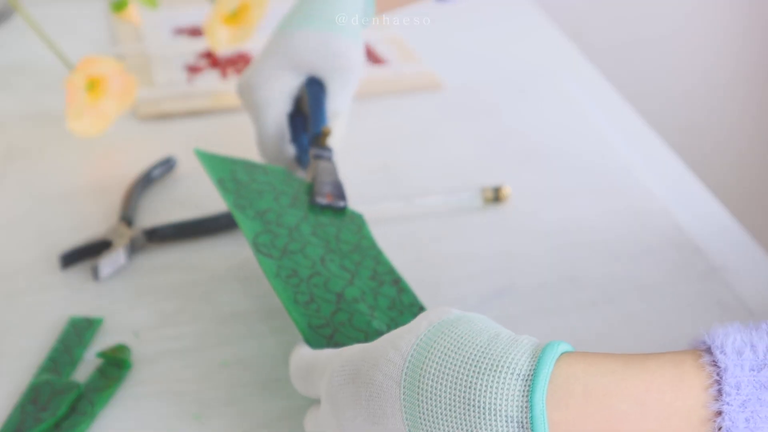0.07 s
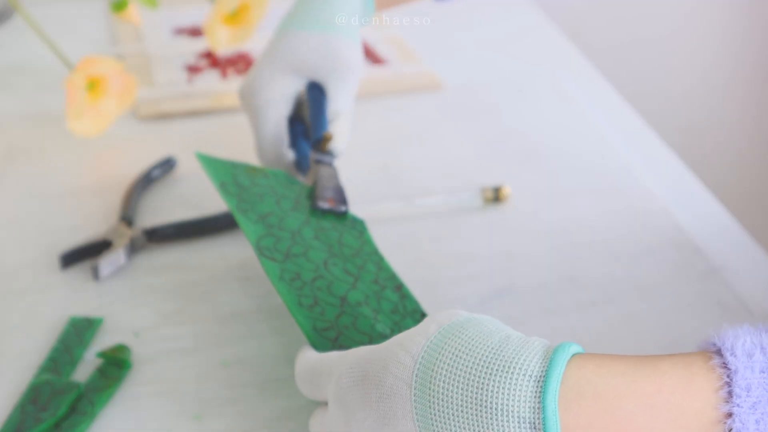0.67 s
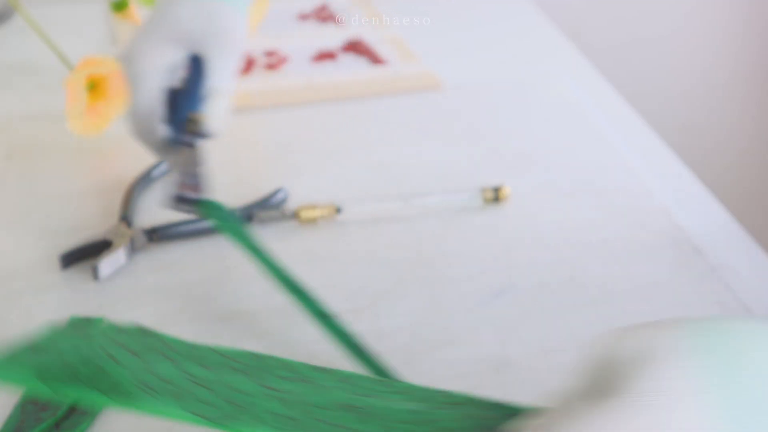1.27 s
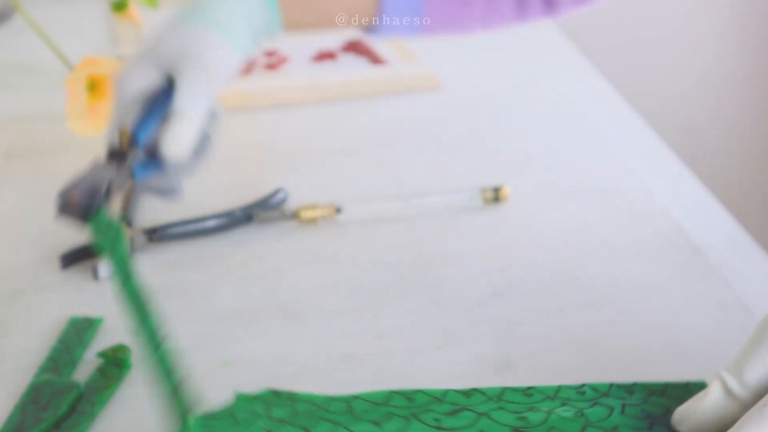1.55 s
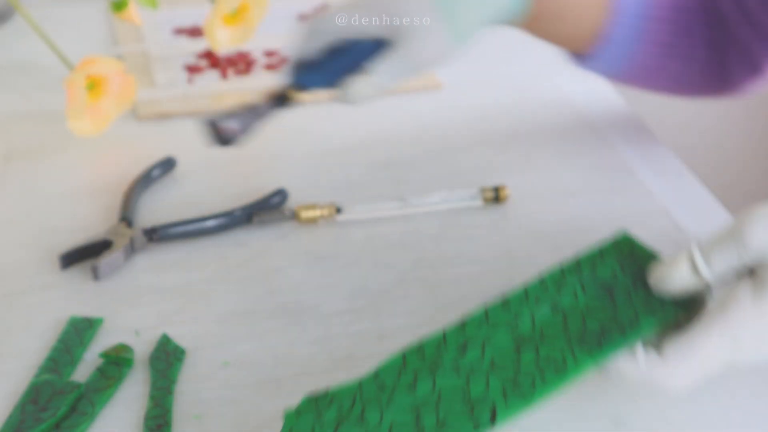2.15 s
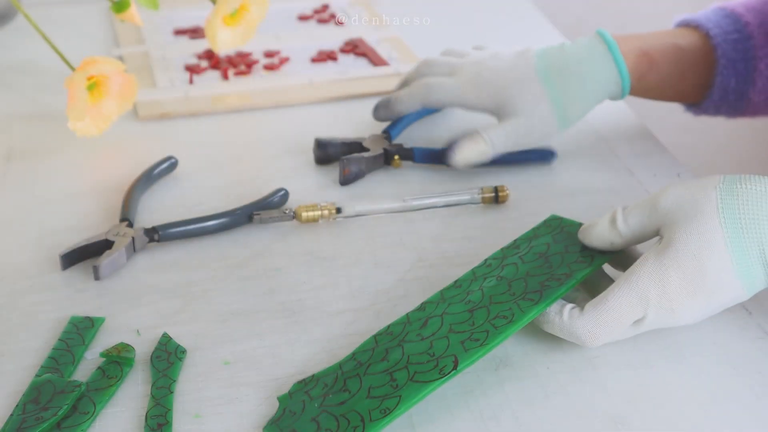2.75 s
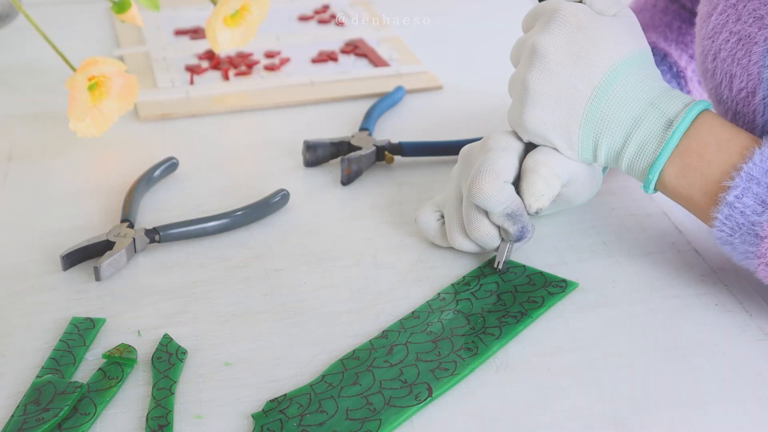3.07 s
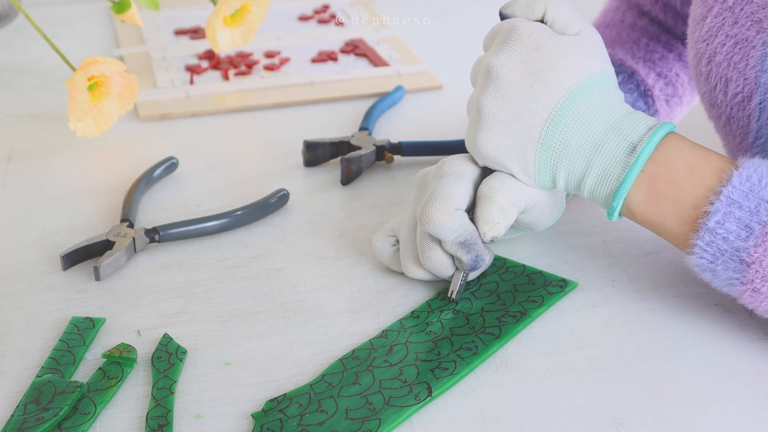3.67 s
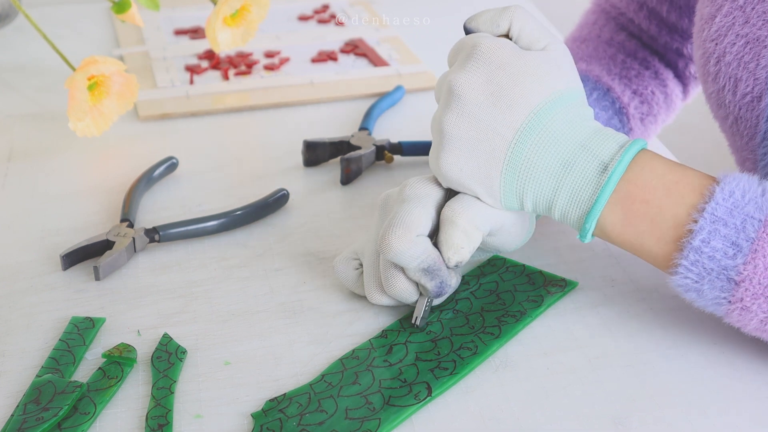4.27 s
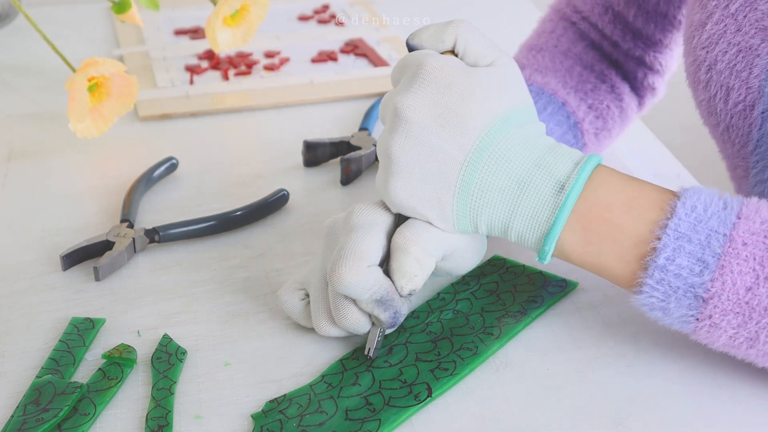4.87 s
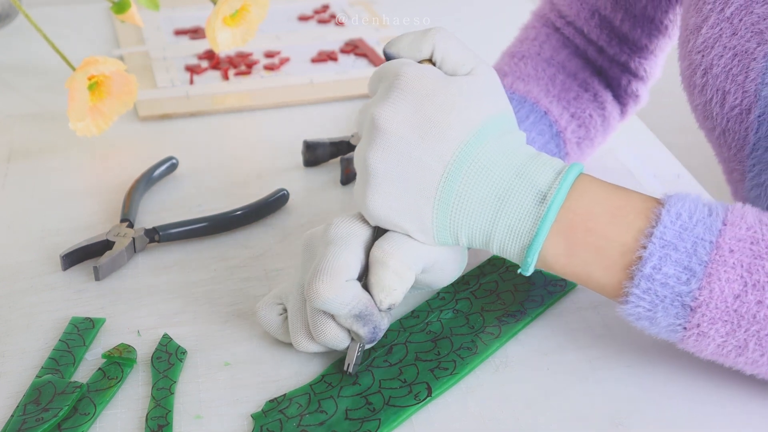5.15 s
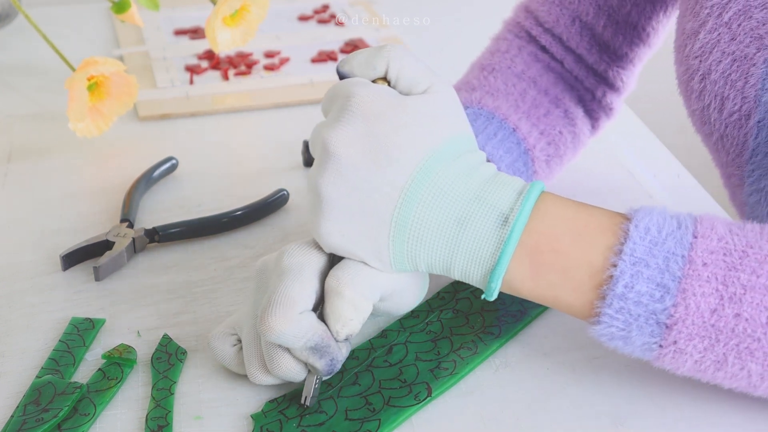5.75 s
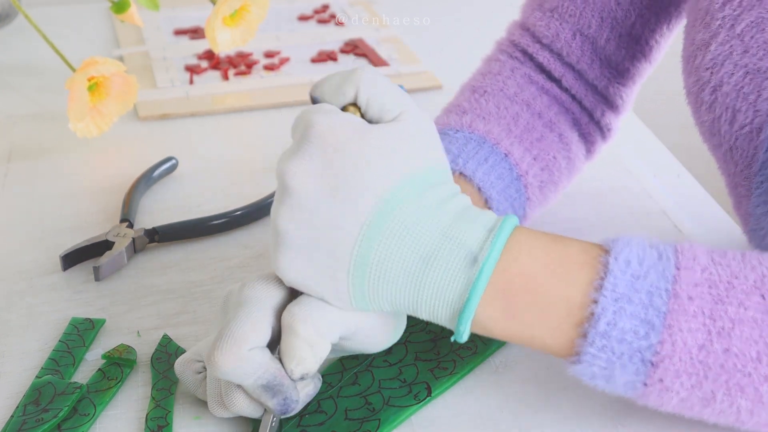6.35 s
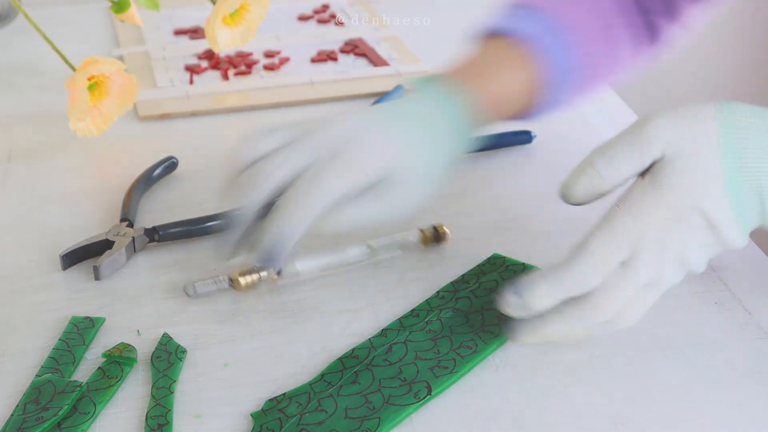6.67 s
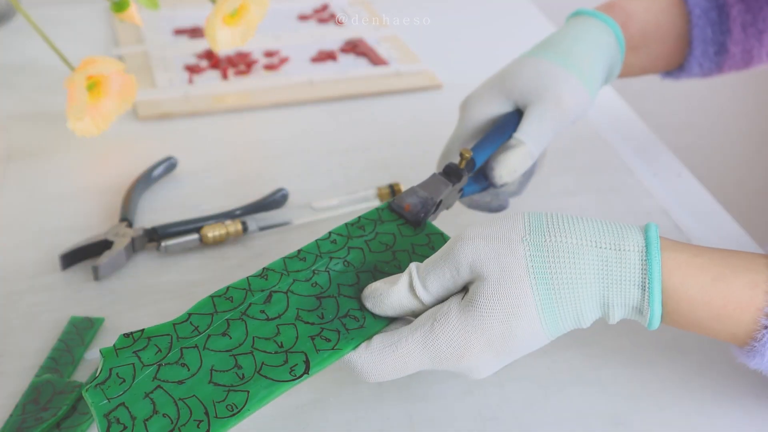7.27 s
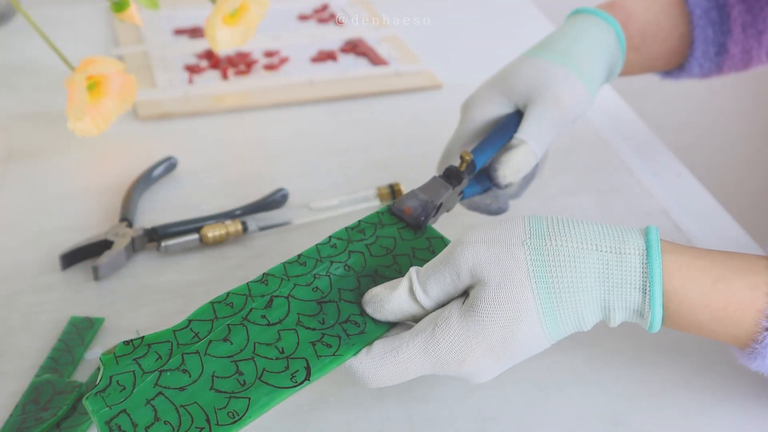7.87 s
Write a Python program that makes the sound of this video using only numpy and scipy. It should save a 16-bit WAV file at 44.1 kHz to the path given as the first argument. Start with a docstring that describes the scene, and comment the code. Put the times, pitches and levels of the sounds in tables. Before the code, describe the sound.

In a quiet, slightly reverberant workshop, glass cracks sharply in the jaws of pliers. The sheet and strip are set down with ringing clinks, followed by a knock and the clunk of the pliers on the bench. The sound moves close up as a glass cutter scores a line, a steady scratchy crackle ending in a few hard clacks. Small plier ticks then lead to a second brittle snap.

```python
"""Stained glass is cut on a workbench. In a live room, pliers tick on a sheet and snap off a strip:
brittle fracture sets the glass ringing. Sheet, strip and pliers are put down, and the bench top booms.
Then, close and dry, a cutter wheel crackles along a new score line, crushing tiny chips in stick-slip
motion, and clacks off the edge. Back in the room the pliers bite, tick and snap the sheet again."""
import sys
import numpy as np
from scipy import signal
from scipy.fft import rfft, irfft, next_fast_len
from scipy.io import wavfile
from scipy.ndimage import uniform_filter1d, map_coordinates

SR = 44100
rng = np.random.default_rng(int(sys.argv[2]) if len(sys.argv) > 2 else 0)


def output_pcm(signal):
    """Save a mono or channel-first signal as 16-bit PCM at the path in sys.argv[1].

    Samples are clipped to [-1, 1] before scaling.
    """
    pcm = np.clip(np.atleast_2d(signal).T, -1, 1) * 32767
    wavfile.write(sys.argv[1], SR, np.round(pcm).astype(np.int16))


N = 353682
CLOSE_START_S, CLOSE_END_S = 2.937, 6.818  # the scene changes to the cutter, heard close and dry

# Reverberation time in the live room and close up: f/Hz, t60/s
ROOM_DECAY = [(100, 0.36), (300, 0.5), (1400, 0.4), (3000, 0.31), (7000, 0.24), (15000, .3)]
CLOSE_DECAY = [(100, 0.18), (1000, .14), (5000, 0.16), (15000, 0.071)]
# Stereo width in the live room and close up: f/Hz, side minus mid/dB
ROOM_WIDTH = [(80, -30.5), (350, -22), (1300, -9), (2400, -5.5), (4500, 5), (8000, 1.5), (15000, 5)]
CLOSE_WIDTH = [(100, -27), (700, -29.5), (1300, -21), (2400, -9.5), (8000, -4), (15000, 9)]
# Free modes of the wide sheet: f/Hz, level/dB, t60/s
WIDE_RING = [(1203, -2.5, 0.35), (1335, -1, 0.3), (1430, -1, .3), (2140, 0, 0.28), (2320, -2, 0.48),
             (2640, -1.5, .26), (3650, -12.5, .25), (6600, -18, 0.254), (9750, -19, 0.28)]
# The wheel stalls at a ridge, then jumps free: t/s of the jump, duration/s, depth/dB
STALLS = [(3.030, 0.042, 2), (3.103, 0.037, 13), (3.159, 0.027, 11), (3.429, 0.016, 6.5),
          (3.593, 0.044, 13), (3.693, 0.042, 14), (3.738, 0.037, 13), (3.796, 0.025, 10.5),
          (4.031, 0.039, 5.5), (4.099, 0.012, 8), (4.282, 0.014, 12), (4.337, 0.029, 7), (4.386, .028, 5),
          (4.425, .016, 10), (4.622, 0.049, 12), (4.746, .018, 3.5), (4.912, 0.06, 11.5), (4.982, 0.022, 7),
          (5.185, 0.016, 8), (5.556, 0.033, 5), (5.634, 0.071, 7), (5.756, 0.047, 3.5), (5.915, 0.036, 7.5),
          (6.148, 0.013, 9), (6.213, 0.027, 9), (6.291, 0.035, 17.5), (6.56, 0.058, 16)]


def amp(db):
    """Amplitude ratio of a level in decibels."""
    return 10 ** (np.asarray(db) / 20)


def leftward(db):
    """Intensity panning: the left channel gains db and the right loses as much."""
    return amp([[db], [-db]])


def unit_rms(x):
    """Normalisation to unit mean power."""
    return x / np.sqrt(np.mean(x ** 2) + 1e-20)


def unit_energy(x):
    """Normalisation of each channel to unit energy."""
    return x / np.linalg.norm(x, axis=1, keepdims=True)


def along(points, hz):
    """Interpolation of (f/Hz, value) points on a logarithmic frequency axis."""
    f, values = np.transpose(points)
    return np.interp(np.log(hz + 1), np.log(f), values)


def resonance(hz, centre_hz, half_width_hz):
    """Lorentzian resonance curve of height 1."""
    return 1 / (1 + ((hz - centre_hz) / half_width_hz) ** 2)


def body_db(spectrum, modes, hz):
    """Frequency response: a spectrum (f/Hz, level/dB) plus modes (f/Hz, half-width/Hz, boost/dB)."""
    return along(spectrum, hz) + sum(db * resonance(hz, f, width) for f, width, db in modes)


def shaped(x, response_db):
    """Minimum-phase filtering: by causality, resonances ring after a blow and never before."""
    size = 2 * next_fast_len(x.shape[-1] // 2 + SR // 8)
    gain = amp(response_db(np.fft.rfftfreq(size, 1 / SR)))
    cepstrum = irfft(np.log(gain + 1e-6))
    cepstrum[1:size // 2] *= 2
    cepstrum[size // 2 + 1:] = 0
    return irfft(rfft(x, size) * np.exp(rfft(cepstrum)), size)[..., :x.shape[-1]]


def stereo(pair, width):
    """Sum and difference turn uncorrelated mid and side signals into left and right."""
    side = shaped(pair[1], lambda hz: along(width, hz))
    return np.array([pair[0] + side, pair[0] - side])


def decay(t, t60):
    """Exponential damping: 60 dB lost in t60 seconds."""
    return np.exp(-np.log(1000) * t / t60)


def bell(t, centre, spread):
    """Gaussian envelope of height 1."""
    return np.exp(-((t - centre) / spread) ** 2)


def diffuse_tail(decay_times):
    """Diffuse field: two noise responses in which each frequency is damped at its own rate."""
    hz, t, bands = signal.stft(rng.standard_normal((2, SR * 3 // 4)), SR, nperseg=256)
    bands = bands * decay(t, along(decay_times, hz)[:, None])
    return unit_energy(signal.istft(bands, SR, nperseg=256)[1])


def blows(rows, spectrum, modes, click, early_db, decay_times=ROOM_DECAY, width=ROOM_WIDTH):
    """Impact excitation: a click and a dense rattle, then early reflections and reverberation.
    Blow rows: t/s, level/dB, bass/dB, treble/dB, rattle t60/s, reverberation/dB."""
    out = np.zeros((2, N + SR))
    for start, db, bass_db, treble_db, t60, room_db in rows:
        tail = diffuse_tail(decay_times)
        t = np.arange(tail.shape[1]) / SR
        rattle = unit_energy(rng.standard_normal(tail.shape) * decay(t, t60))
        rattle[0, 0] = click  # from straight ahead
        early = unit_energy(rng.standard_normal(tail.shape) * bell(t, 0.0083, 0.0027))
        late = tail * (1 - np.exp(-t / 0.0027))
        burst = unit_energy(rattle) + amp(early_db) * early + amp(room_db) * late
        # Heavy contacts add bass, hard ones add treble.
        contact_db = lambda hz: bass_db / (1 + (hz / 700) ** 2) + treble_db * hz**2 / (hz**2 + 4000**2)
        hit = stereo(shaped(burst, lambda hz: body_db(spectrum, modes, hz) + contact_db(hz)), width)
        attack_rms = np.sqrt(np.mean(hit[:, :SR // 100] ** 2))
        out[:, round(start * SR):][:, :len(t)] += amp(db) * hit / attack_rms
    return out[:, :N]


def ringing(start, modes, gain_db, phase_spread=0.41, diffuse_db=0, flutter_per_s=70):
    """Free vibration of damped modes; interference with room echoes makes each one flutter."""
    t = np.arange(SR) / SR
    ring = np.zeros((2, SR))
    for hz, db, t60 in modes:
        knots = rng.standard_normal((2, SR // 100))
        echoes = np.interp(t * flutter_per_s, np.arange(knots.shape[1]), knots[0] + 1j * knots[1])
        flutter = (1 + amp(diffuse_db) * echoes) / np.sqrt(1 + amp(diffuse_db) ** 2)
        phase = 2 * np.pi * hz * t + rng.normal(0, phase_spread, (2, 1))
        ring += amp(db) * decay(t, t60) * np.imag(flutter * np.exp(1j * phase))
    return amp(gain_db) * np.pad(ring, ((0, 0), (round(start * SR), N)))[:, :N]


def coloured_noise(spectrum, width):
    """Spectral shaping of white noise into a steady stereo hiss of unit power."""
    noise = shaped(rng.standard_normal((2, N)), lambda hz: along(spectrum, hz))
    return unit_rms(stereo(noise, width))


def room_tone(air_db=-52.68, hum_db=-63, hum_hz=204):
    """Broadband air noise, joined by a faint narrow-band hum after the close passage."""
    # Spectrum of the air: f/Hz, level/dB; its width: f/Hz, side minus mid/dB
    air_spectrum = [(19, -33), (32, -7.5), (60, -7), (140, -14), (219, -5.5), (340, -14.5), (504, -15),
                    (826, -19.5), (7330, -39.5), (16000, -66)]
    air_width = [(40, -15.5), (200, -7), (700, 0), (4000, 3.5)]
    air = coloured_noise(air_spectrum, air_width)
    hum = unit_rms(shaped(rng.standard_normal(N), lambda hz: 20 * np.log10(resonance(hz, hum_hz, 7))))
    return amp(air_db) * air + amp(hum_db) * hum * (np.arange(N) > CLOSE_END_S * SR)


def close_hiss(level_db=-56):
    """Stationary noise behind the cutter, strongest in the bass."""
    # Spectrum of the hiss: f/Hz, level/dB
    hiss_spectrum = [(25, -14.5), (70, -7.5), (150, 6), (400, -2.5), (1500, -6.5), (6000, -14.5),
                     (12000, -20.5), (16000, -22.5)]
    return amp(level_db) * coloured_noise(hiss_spectrum, CLOSE_WIDTH)


def bench_booming(boom_db=-12):
    """Heavy contacts excite the low plate modes of the bench top."""
    # Contacts (blow rows) and the bench's response (columns as in body_db)
    thuds = [(2.490, -19, -0.5, -2, 0.15, -3.5), (2.790, -24.5, 6, -3, 0.22, -0.5)]
    bench_spectrum = [(15, -57), (25, -26), (54, -18), (124, -6), (198, -7.5), (253, -2), (286, -16),
                      (332, -4), (630, -10.5), (826, -25), (1190, -18.5), (1690, -28.5), (2160, -26.5),
                      (9000, -80), (11700, -108)]
    bench_modes = [(76.6, 6.9, 3.6), (139, 19, 2.7), (264, 8.7, 2.3), (340, 7.7, 3.5), (1237, 40, 3.7),
                   (1650, 100, 10.5)]
    # Free modes of the top: f/Hz, level/dB, t60/s
    bench_ring = [(137, -9, 0.33), (258, 4, 0.59), (326.8, 9, 0.27), (403, -4, 0.55), (467, 2, 0.31)]
    out = blows(thuds, bench_spectrum, bench_modes, click=0.14, early_db=-41)
    for start, db, *_ in thuds:
        out += ringing(start, bench_ring, db + boom_db,
                       phase_spread=0.1, diffuse_db=-22, flutter_per_s=24.5)
    return out


def pliers_laid_down():
    """Impact of steel on wood: the nose touches, the whole weight follows and the tool rings."""
    # Contacts of the nose and of the whole tool (blow rows)
    nose_touch = [(2.769, -41, 3, 2, .06, -5)]
    tool_drop = [(2.7899, -14, 0, 1, 0.011, -3), (2.7955, -14, 0, -3, 0.074, -2.5)]
    # Their responses (columns as in body_db)
    steel_on_wood = [(50, -5), (300, -20), (780, -17.5), (980, -1), (1500, 0.5), (2300, -4), (3000, -14.5),
                     (3700, -22.5), (5000, -31.5), (7500, -37), (15000, -62)]
    nose_modes = [(1400, 150, 10), (5400, 350, 33), (7800, 600, 22)]
    tool_modes = [(1555, 82, 6.3)]
    # Free modes of the steel: f/Hz, level/dB, t60/s
    steel_ring = [(1136, -2, 0.52), (1330, 4.5, 0.73), (1410, -7, .45), (1550, -14, .48)]
    touch = blows(nose_touch, steel_on_wood, nose_modes, click=0.3, early_db=-12)
    drop = blows(tool_drop, steel_on_wood, tool_modes, click=0.99, early_db=-6)
    return touch + drop + ringing(tool_drop[0][0], steel_ring, gain_db=-29.5)


def glass_laid_down(sheet_down_s=1.7965, strip_drop_s=1.9961, far_end_lag_s=0.0054, soft_limit_hz=1800):
    """The strip brushes along the sheet, then glass lands end by end; a soft contact excites only the low
    modes."""
    # Landings and bounces: t/s, level/dB, bass/dB, treble/dB, resonance f/Hz, second contact/dB
    knocks = [(1.014, -27.5, 1.5, -4, 3260, -2), (1.7965, -14.5, -2, -0.5, 1370, -1),
              (1.81, -25.5, -2, 0, 1410, -13), (1.9964, -10.5, 0, 3, 2350, -6),
              (2.0455, -23, 0, -6, 1600, -4), (2.224, -34, 2, 3.5, 1860, -6.5)]
    # Light brushes of the strip along the sheet: t/s, level/dB
    brushes = [(1.185, -52), (1.234, -51.5), (1.298, -51), (1.346, -49.5)]
    # Response of glass on wood (columns as in body_db)
    glass_on_wood = [(29, -58), (50, -14), (277, -8), (398, -15.5), (586, -9), (678, -11), (1360, -4),
                     (1870, -6), (2210, -7.5), (4240, -24), (6550, -33), (7210, -30.5), (10100, -37.5),
                     (14900, -58), (16000, -73.5)]
    glass_modes = [(910, 80, 2), (1320, 60, 3.6), (2230, 149, 4.8), (2730, 500, 2)]
    # Free modes of the dropped strip: f/Hz, level/dB, t60/s
    strip_ring = [(1231, 2.5, 0.34), (1620, -5.5, 0.33), (2300, -3.5, .3), (2575, -11.5, .3),
                  (7260, -15.5, .25), (10040, -15.5, 0.28)]
    out = np.zeros((2, N))
    for start, db, bass_db, treble_db, hz, second_db in knocks:
        ends = [(start, db, bass_db, treble_db, 0.03, -1.5),
                (start + far_end_lag_s, db + second_db, bass_db, treble_db, 0.048, -4)]
        out += blows(ends, glass_on_wood, glass_modes + [(hz, 110, 7)], click=0.69, early_db=-16)
    brush_rows = [(start, db, 0, -1, 0.19, 0) for start, db in brushes]
    out += blows(brush_rows, glass_on_wood, glass_modes, click=0.15, early_db=-12.5)
    low_modes = [mode for mode in WIDE_RING if mode[0] < soft_limit_hz]
    out += ringing(sheet_down_s, low_modes, gain_db=-29)
    return out + ringing(strip_drop_s, strip_ring, gain_db=-25.5)


def jaws_ticking(t60_s=0.021, room_db=-5):
    """Hard, brief contacts give bright ticks as the jaws grit on the glass edge."""
    # Ticks: t/s, level/dB, bass/dB, treble/dB, resonance f/Hz
    ticks = [(0.402, -36, -39, -26.5, 2790), (0.936, -55.5, -4, -11, 8050), (7.2346, -28.5, 20, -2.5, 6400),
             (7.2925, -40, 15, -14, 1485), (7.4604, -33.5, 13, 23, 7900), (7.6043, -23.5, -17, 11.5, 5450)]
    # Response of the jaws on glass (columns as in body_db)
    jaw_spectrum = [(350, -45.5), (600, -24), (1330, -2.5), (2500, -1.5), (4300, -3), (5200, -3.5),
                    (9500, -8), (12500, -13.5), (14500, -24.5), (16000, -37.5)]
    jaw_modes = [(1407, 240, 7), (2330, 180, 9.9), (3090, 290, 12), (5200, 150, 6.9), (6460, 450, 14),
                 (8000, 400, 10), (9900, 430, 13)]
    return sum(blows([(*tick, t60_s, room_db)], jaw_spectrum, jaw_modes + [(hz, 300, 5)],
                     click=0.46, early_db=-9.5) for *tick, hz in ticks)


def cutter_clacking():
    """Impact transients: the wheel drops off the edge and the cutter knocks."""
    # Knocks (blow rows) and the cutter's response (columns as in body_db)
    clacks = [(6.561, -12, -1.5, 3, 0.055, -4.5), (6.718, -11.5, -13.5, 0.5, 0.03, -0.5),
              (6.738, -17.5, 0, -4, 0.055, 1.5), (6.807, -41, 37, -19, 0.032, -9)]
    cutter_spectrum = [(30, -37), (70, -26), (130, -15), (220, -16), (430, -8.5), (580, -12), (800, -4.5),
                       (1450, -10.5), (2800, -13.5), (3700, -11), (6300, -11.5), (9500, -18.5),
                       (16000, -45.5)]
    cutter_modes = [(464, 100, 5.6), (790, 30, 4.3), (1004, 49, 5.7), (1890, 440, 4), (3660, 390, 4),
                    (5280, 180, 4.4), (6430, 150, 4.2), (7200, 140, 3.2)]
    return blows(clacks, cutter_spectrum, cutter_modes, click=0.48, early_db=-16,
                 decay_times=CLOSE_DECAY, width=CLOSE_WIDTH)


def chipping(t, chips_per_s=9000, scatter_db=2.5, judder_per_s=200, judder_db=2.5):
    """Shot noise: each chip is an impulse, and judder over the textured glass clumps their strength."""
    sizes = rng.standard_normal((2, N)) * amp(scatter_db * np.clip(rng.standard_normal(N), -2, 2))
    chips = sizes * (rng.random(N) < chips_per_s / SR)
    knots = np.clip(rng.standard_normal(N // 50), -1.5, 1.5)
    judder = map_coordinates(knots, [t * judder_per_s], order=1)
    return chips * amp(judder_db * judder)


def travelling_ring(t, chips, shift_s=0.4536):
    """A plate's response depends on the driving point: one dense ring fades into the next."""
    out = np.zeros((2, N + SR))
    for at in np.arange(CLOSE_START_S, CLOSE_END_S, shift_s):
        near = np.flatnonzero(np.abs(t - at) < shift_s)
        fade = np.cos(np.pi / 2 * (t[near] - at) / shift_s)
        ring = signal.fftconvolve(chips[:, near] * fade, diffuse_tail(CLOSE_DECAY), axes=1)
        out[:, near[0]:][:, :ring.shape[1]] += ring
    return out[:, :N]


def swelling(scratch, rough_hz=1520, rough_width_hz=790):
    """A mode swells when driven at its antinode; rough patches bring out a lower scrape."""
    # Antinodes under the wheel: f/Hz, half-width/Hz, boost/dB, t/s, spread/s
    antinodes = [(3370, 190, 10, 3.77, 0.79), (7270, 180, 9, 3.9, 0.753), (9880, 290, 7, 3.6, 0.83),
                 (4260, 53, 0, 3.2, .6), (5000, 490, 4.5, 5.15, 0.39), (3730, 80, 4, 5.6, 0.52),
                 (9290, 295, 8.5, 5.15, 0.74), (1480, 45, 13, 5.45, 1), (1700, 78, 8.5, 5.9, 0.99),
                 (2320, 70, 4.5, 6.2, 0.47), (7090, 110, 13.5, 6, 0.49), (9070, 130, 12, 6.31, 0.31)]
    # Rough patches of glass: t/s, spread/s, boost/dB
    rough_patches = [(2.97, .02, 4), (3.21, 0.018, 6), (3.905, 0.023, 5), (4.045, .018, 6.5),
                     (4.105, .012, 9), (4.185, 0.028, 10), (5.36, 0.046, 0.5), (6.168, 0.016, 3.5),
                     (6.238, 0.011, 4.5)]
    swells = antinodes + [(rough_hz, rough_width_hz, db, at, spread) for at, spread, db in rough_patches]
    hz, t, bands = signal.stft(scratch, SR, nperseg=512)
    swell_db = sum(db * np.outer(resonance(hz, f, width), bell(t, at, spread))
                   for f, width, db, at, spread in swells)
    return signal.istft(bands * amp(swell_db), SR, nperseg=512)[1][:, :N]


def stick_slip(t, slowing_share=0.4, surge_db=0.5, surge_s=0.051, catches_per_s=9, catch_s=0.013):
    """Stick-slip speed in dB: the wheel slows at ridges, surges free and catches at random."""
    speed_db = np.zeros(N)
    for jump, length, depth_db in STALLS:
        slowing = np.clip((t - jump + length) / (slowing_share * length), 0, 1)
        surge = np.exp(-np.abs(t - jump) / surge_s)
        speed_db += np.where(t < jump, -depth_db * slowing, surge_db * surge)
    catches = (rng.random(N) < catches_per_s / SR).astype(float)
    caught = signal.fftconvolve(catches, np.linspace(0, 1, round(catch_s * SR)))[:N]
    return speed_db - 3 * np.clip(caught, 0, 1)


def wheel_scoring(ring_db=-4, split_hz=3400, plate_db=-9.5, crackle_db=-0.5):
    """Forced vibration: crushed chips drive the sheet, louder with the wheel's pressure and speed."""
    # Response of the sheet lying on the bench (columns as in body_db)
    score_spectrum = [(30, -34), (70, -18), (120, -4.5), (200, -6.5), (350, -1.5), (900, -0.5), (1200, -5),
                      (2200, -5.5), (3000, -7.5), (4300, -2.5), (5500, 1), (8400, -2.5), (10500, -3.5),
                      (13000, -8), (16000, -11.5)]
    score_modes = [(152.7, 10, 12.5), (240, 13, 4.9), (378.5, 25.6, 7.3), (488, 19, 5.5), (778, 22, 4.2),
                   (970, 18, 2.8), (2470, 62, 4), (3740, 22.8, 5.3), (6350, 31, 4)]
    # Its stereo width: f/Hz, side minus mid/dB
    score_width = [(60, -19.5), (110, -36.5), (200, -17.5), (380, -14), (700, -9), (1290, -8), (2380, -12),
                   (4400, -7.5), (8120, -3.5), (15000, 7)]
    # Pressure on the wheel, as loudness of the crackle: t/s, level/dB
    pressure_curve = [(2.94, -37.5), (3.07, -44), (3.2, -41), (3.9, -42.5), (4.35, -42), (4.7, -40.5),
                      (5.2, -41.5), (5.65, -40), (6.1, -39), (6.35, -39.5), (6.49, -34.5)]
    t = np.arange(N) / SR
    chips = chipping(t)
    rung = chips + amp(ring_db) * travelling_ring(t, chips)
    scratch = shaped(rung, lambda hz: body_db(score_spectrum, score_modes, hz))
    scratch = swelling(stereo(scratch, score_width))
    lows = signal.sosfiltfilt(signal.butter(2, split_hz, fs=SR, output="sos"), scratch)
    speed_db = stick_slip(t)
    plate = unit_rms(lows) * amp(plate_db + 0.45 * speed_db)  # follows the speed less closely
    crackle = unit_rms(scratch - lows) * amp(crackle_db + speed_db)
    pressure = amp(np.interp(t, *np.transpose(pressure_curve)))
    on_glass = t < STALLS[-1][0]  # the last stall is the edge
    return on_glass * pressure * (plate + crackle)


def sheet_snapping():
    """Brittle fracture: a crack runs along the score and the freed sheet rings in its modes."""
    # The two cracks (blow rows)
    first_snap = [(0.450, -11, -6.5, 3, 0.034, -3)]
    second_snap = [(7.706, -17.5, 0.0041, 0, 0.043, -7.5)]
    # Responses of the sheet, first wide, then narrow (columns as in body_db)
    wide_spectrum = [(150, -60.5), (250, -32), (1120, -6.5), (1350, -2), (1910, -4.5), (2200, -6),
                     (3230, -13), (3770, -12), (4340, -22.5), (5500, -17.5), (6500, -15), (7150, -25),
                     (10200, -27), (16000, -46.5)]
    wide_modes = [(493, 70, 16), (1340, 47, 9.2), (2250, 92, 12), (2690, 220, 12.5), (3600, 90, 8),
                  (4790, 100, 6), (6150, 220, 7.3), (6480, 60, 9), (7850, 150, 15), (9800, 90, 11),
                  (10450, 71, 12), (12400, 90, 8)]
    narrow_spectrum = [(150, -56.5), (250, -24), (393, -18), (560, -6.5), (1060, 0), (1800, -8),
                       (2100, -10.5), (2400, -2.5), (4260, -21.5), (4800, -13), (6500, -17), (8550, -15.5),
                       (9660, -12), (14200, -28), (16000, -42)]
    narrow_modes = [(1005, 65, 5), (1380, 72, 6.2), (1770, 140, 10.6), (2410, 120, 11.6), (3520, 150, 13),
                    (5050, 220, 6.4), (6150, 140, 4), (7950, 110, 17), (9550, 200, 6.2)]
    # Free modes of the narrow sheet: f/Hz, level/dB, t60/s
    narrow_ring = [(620, -11, 0.4), (880, -2.5, 0.47), (1090, -3, 0.3), (1424, -2, 0.28), (1730, -7, 0.26),
                   (2400, -17, .22), (3700, -3, 0.32), (4899, -5, 0.3), (8000, -2, 0.32), (10600, -19, .2)]
    first = blows(first_snap, wide_spectrum, wide_modes, click=0.4, early_db=-8)
    first += ringing(first_snap[0][0], WIDE_RING, gain_db=-37.5)
    second = blows(second_snap, narrow_spectrum, narrow_modes, click=0.36, early_db=-28)
    second += ringing(second_snap[0][0], narrow_ring, gain_db=-35)
    return leftward(0.4) * first + leftward(1) * second


def scene():
    """Superposition of the sources: the scene changes from the live room to the close, dry cutter, then changes
    back."""
    t = np.arange(N) / SR
    close = uniform_filter1d(((t > CLOSE_START_S) & (t < CLOSE_END_S)).astype(float), size=88)
    cutter = leftward(0.3) * (close_hiss() + wheel_scoring() + cutter_clacking())
    breaking = leftward(1) * jaws_ticking() + sheet_snapping()
    breaking[0] = np.roll(breaking[0], 3)  # arrives a moment later on the left
    putting_down = leftward(0.5) * (glass_laid_down() + pliers_laid_down() + bench_booming())
    return close * cutter + (1 - close) * (breaking + putting_down + room_tone())


def record(dry, top_hz=16150):
    """Hard clipping at full scale, then band limiting by a low-pass filter."""
    lowpass = signal.firwin(255, top_hz, fs=SR, window="blackman")
    return signal.fftconvolve(np.clip(dry, -1, 1), lowpass[None], mode="same", axes=1)


dry = scene()
out = record(dry)
output_pcm(out)
```